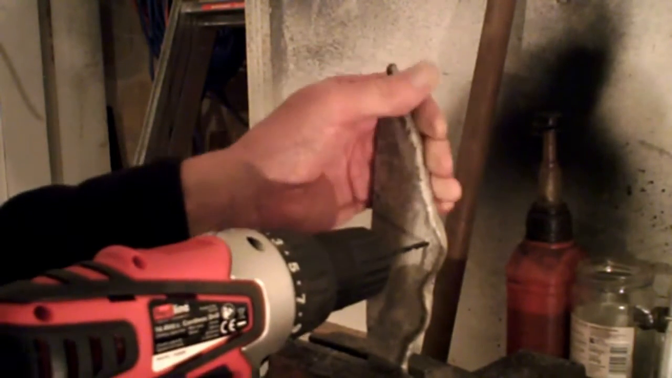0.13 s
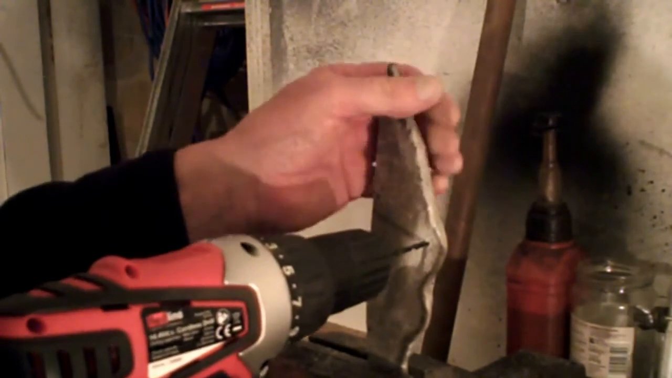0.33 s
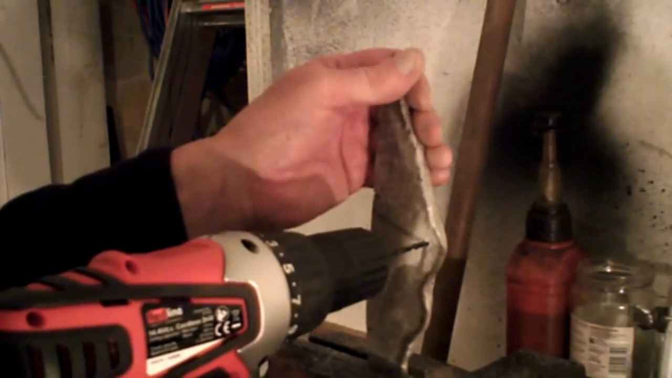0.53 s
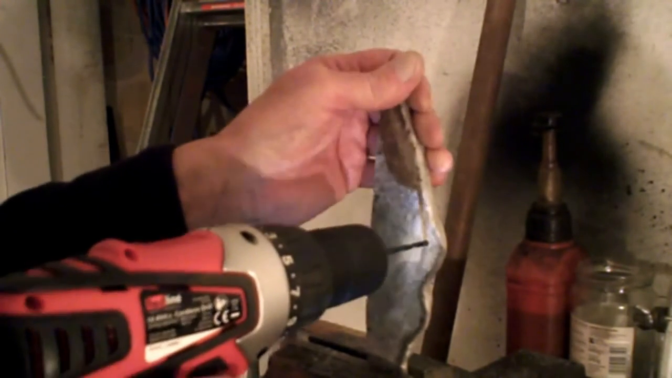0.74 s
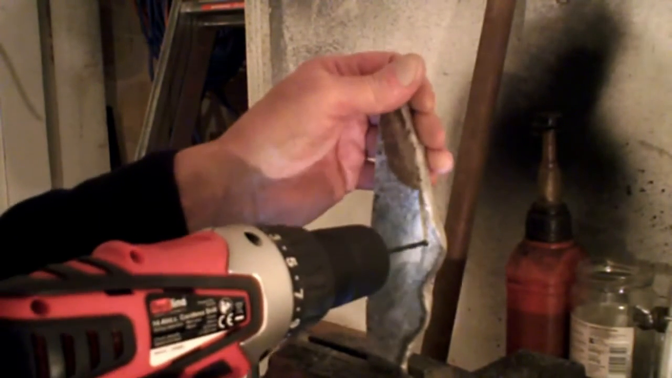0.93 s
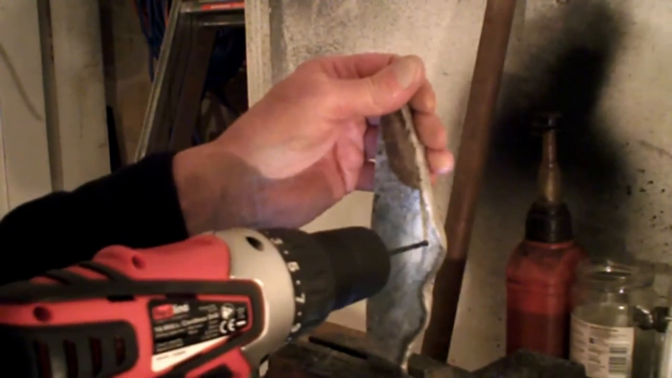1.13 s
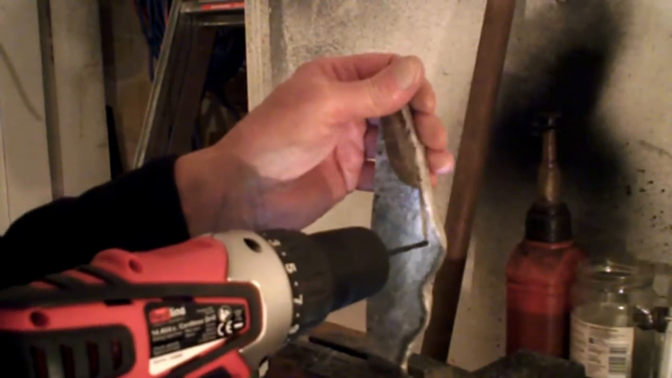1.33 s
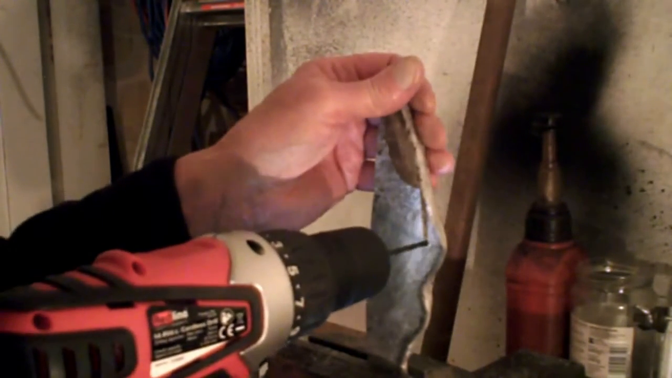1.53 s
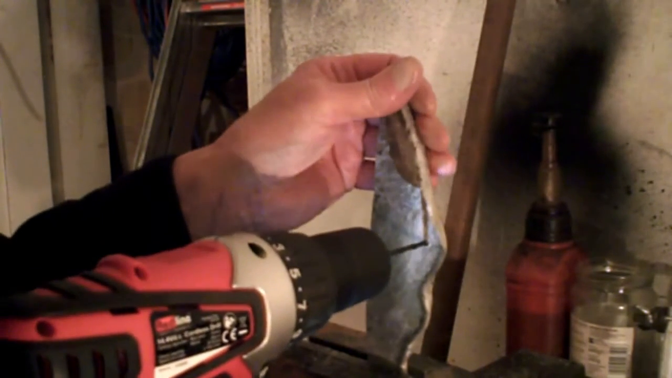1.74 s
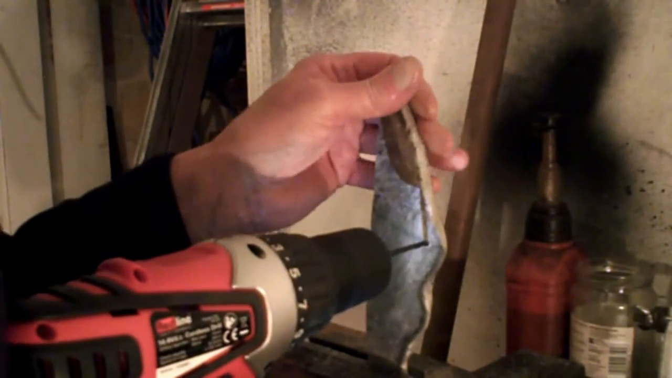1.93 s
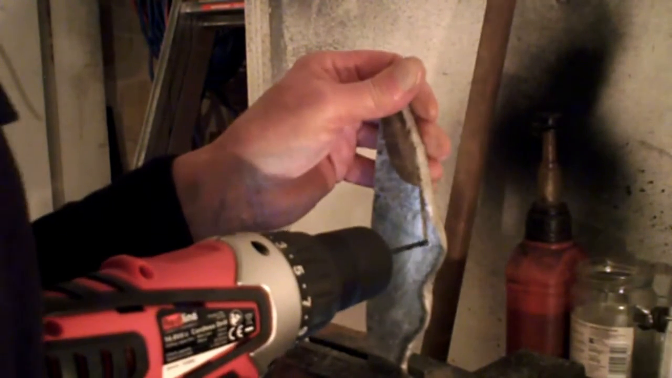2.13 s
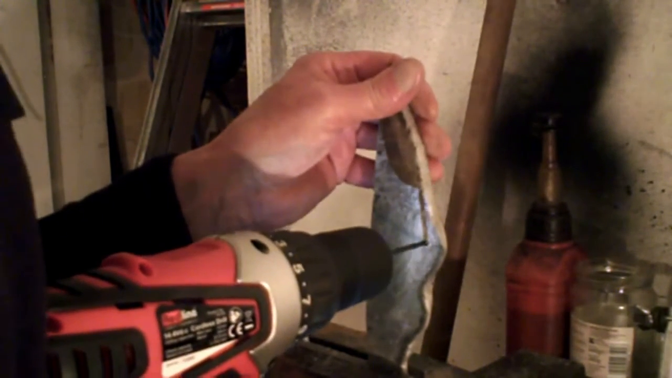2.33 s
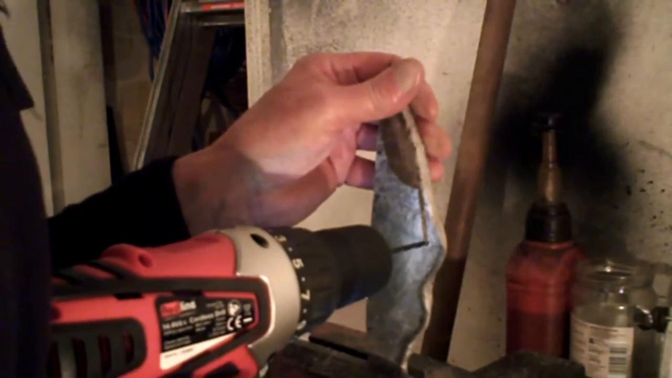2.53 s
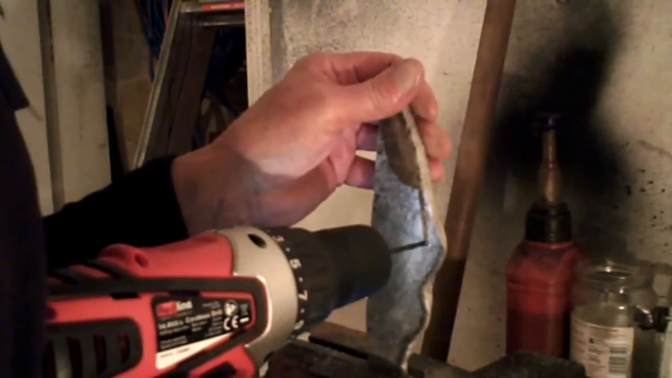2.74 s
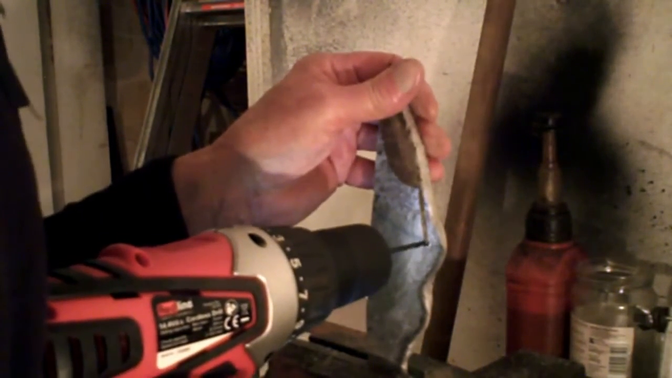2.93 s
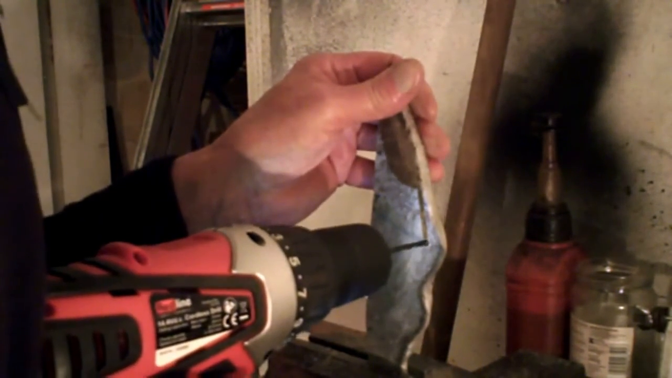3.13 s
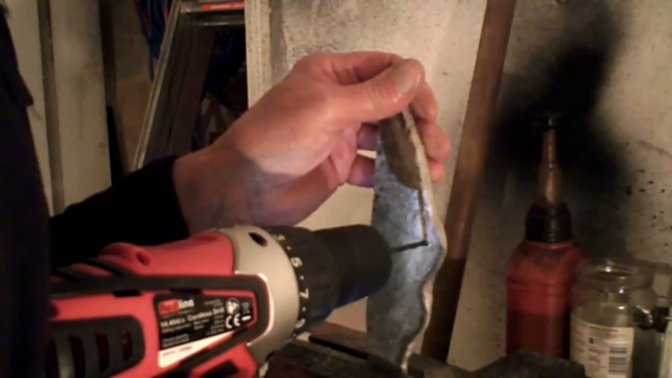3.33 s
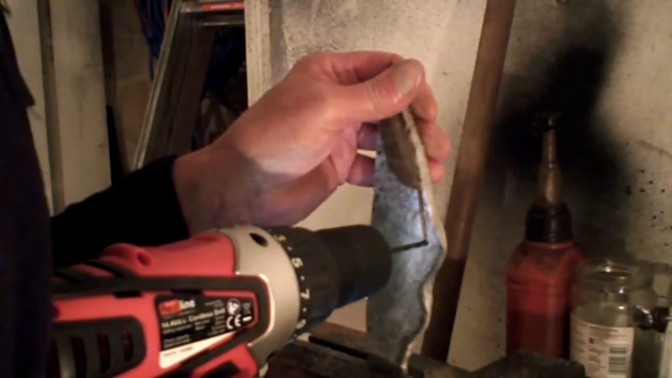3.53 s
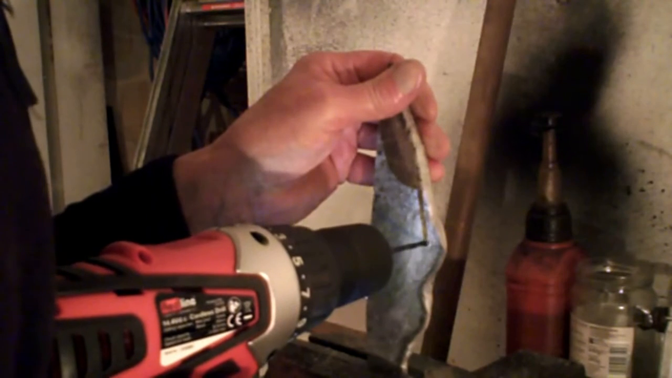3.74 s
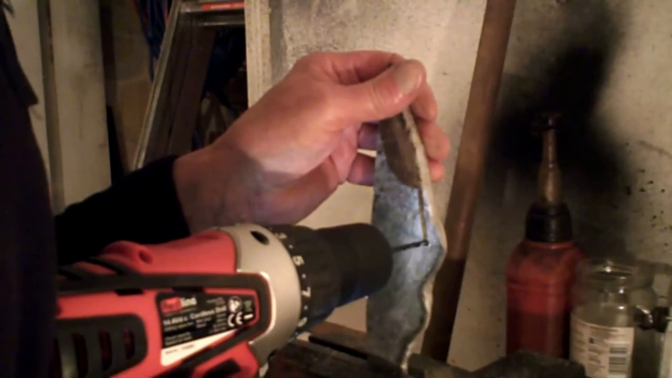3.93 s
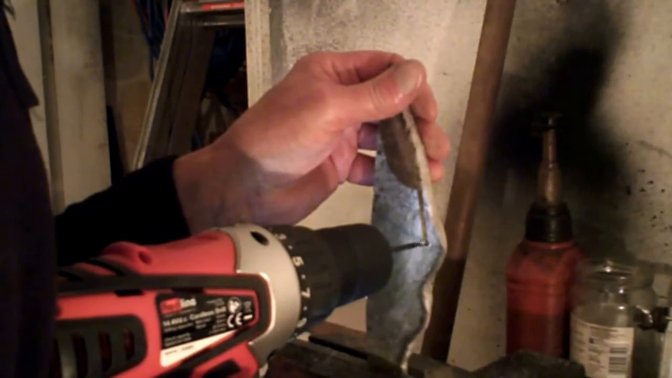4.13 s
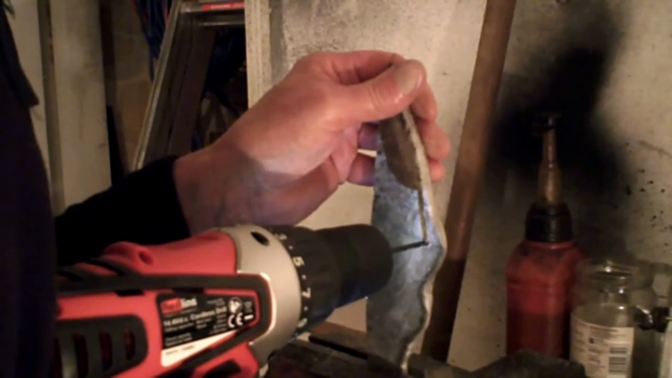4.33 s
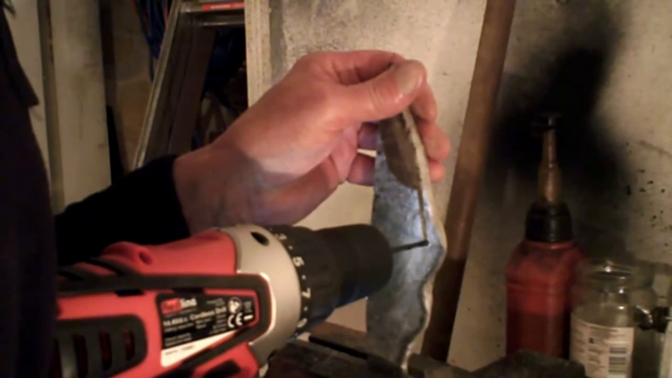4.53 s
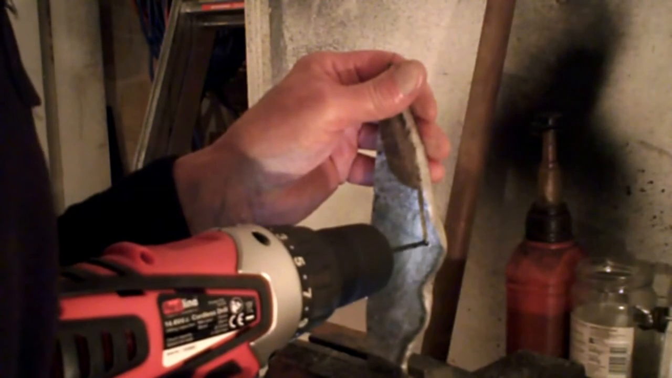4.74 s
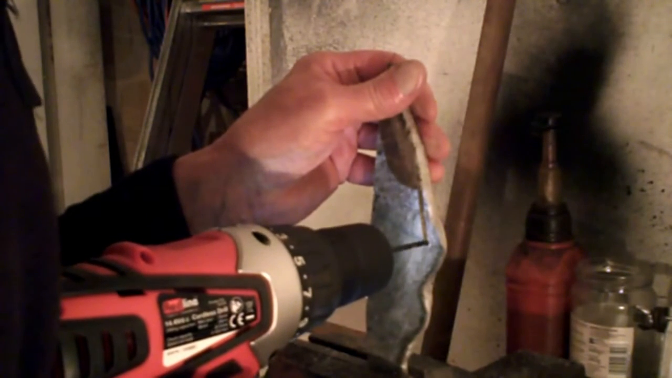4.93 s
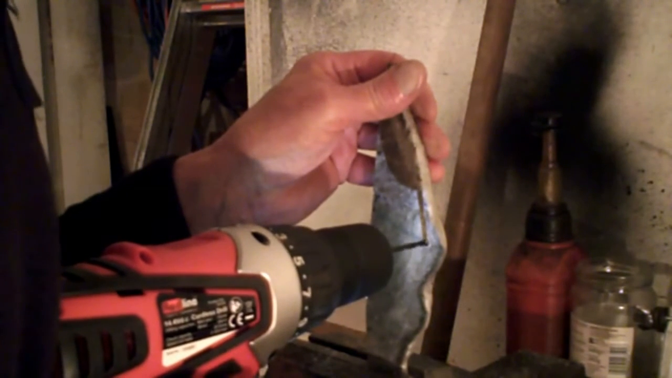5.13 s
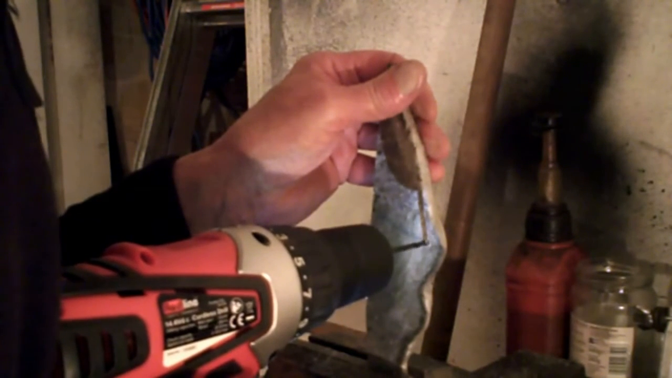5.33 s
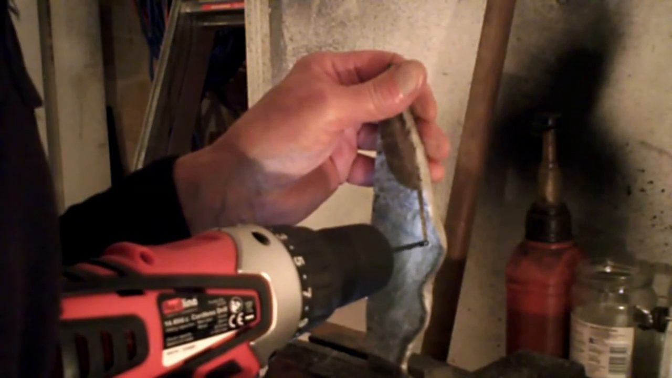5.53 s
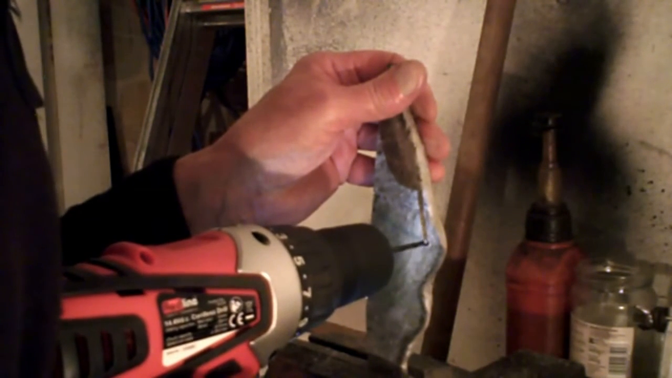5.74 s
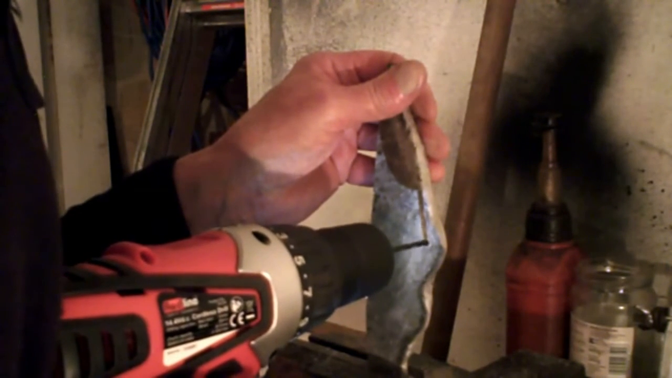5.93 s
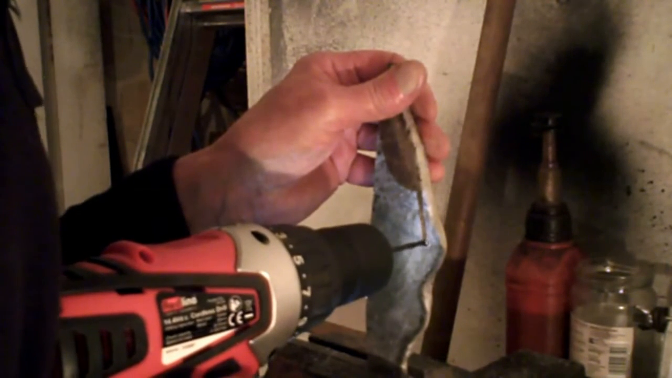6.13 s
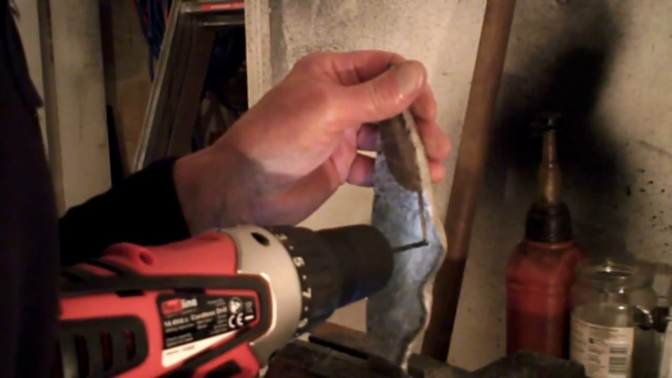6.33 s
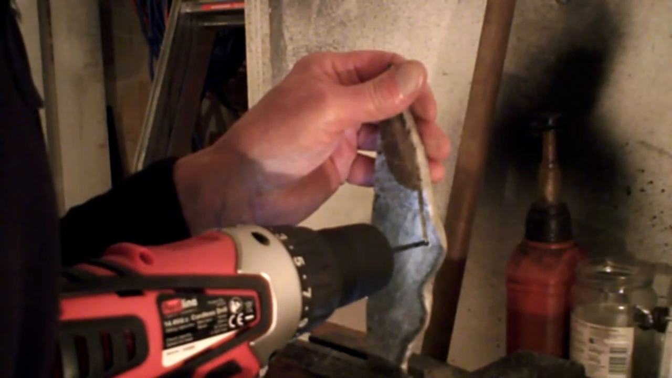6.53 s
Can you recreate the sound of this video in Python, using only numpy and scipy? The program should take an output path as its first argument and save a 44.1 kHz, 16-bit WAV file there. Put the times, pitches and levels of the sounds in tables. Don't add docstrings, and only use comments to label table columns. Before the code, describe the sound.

After faint handling knocks, a cordless drill clicks on, whirs up fast, then bites metal with a lower, gritty, pulsing whine in a quiet shed.

```python
import sys
import numpy as np
from scipy import signal
from scipy.fft import rfft, irfft, next_fast_len
from scipy.io import wavfile

SR = 44100
rng = np.random.default_rng(int(sys.argv[2]) if len(sys.argv) > 2 else 0)


def wrap_up_sound(samples):
    columns = np.atleast_2d(samples).T
    tamed = np.clip(columns, -1, 1)
    steps = np.round(tamed * 32767).astype(np.int16)
    wavfile.write(sys.argv[1], SR, steps)


def linear_from_db(decibels):
    return 10 ** (np.asarray(decibels, float) / 20)


N = 290619


def rms_one(x):
    return x / np.sqrt(np.mean(x ** 2) + 1e-20)


def drift(rate_hz):
    pole = np.exp(-80 * np.pi * rate_hz / SR)
    steps = rng.standard_normal(N // 40 + 2002)
    slow = signal.lfilter([1], [1, -2 * pole, pole * pole], steps)[2000:]
    return np.interp(np.arange(N) / 40, np.arange(len(slow)), rms_one(slow))


def hump(hz, centre_hz, width_hz, top_db):
    return top_db / (1 + (2 * (hz - centre_hz) / width_hz) ** 2)


def coloured(noise, spectrum, peaks=()):
    size = next_fast_len(N)
    hz = np.arange(size // 2 + 1) * SR / size + 1
    spectrum_hz, spectrum_db = np.transpose(spectrum)
    level_db = np.interp(np.log(hz), np.log(spectrum_hz), spectrum_db)
    for centre_hz, width_hz, top_db in peaks:
        level_db = level_db + hump(hz, centre_hz, width_hz, top_db)
    return rms_one(irfft(rfft(noise, size) * linear_from_db(level_db), size)[:N])


def ring(clicks, hz, t60):
    r, w = linear_from_db(-60 / (t60 * SR)), 2 * np.pi * hz / SR
    return signal.lfilter([0, np.sin(w)], [1, -2 * r * np.cos(w), r * r], clicks + 1e-18)


def band(x, low_hz, high_hz):
    return signal.sosfilt(signal.butter(2, [low_hz, high_hz], "band", fs=SR, output="sos"), x)


def lowpass(x, top_hz):
    return signal.sosfiltfilt(signal.butter(2, top_hz, fs=SR, output="sos"), x)


def controls():
    trigger_s, spin_up_s = .7154, .059
    bite_from_s, bite_s = 1.19, .87
    s = np.arange(N) / SR
    run = 1 - np.exp(-np.maximum(s - trigger_s, 0) / spin_up_s)
    effort = 4 * run * (1 - run)
    bite = np.clip((s - bite_from_s) / bite_s, 0, 1)
    return s, run, effort, bite


# (time [s], speed it settles to [turns/s])
MOTOR_SPEED = [(1.1, 337.3), (1.85, 337.8), (2.02, 336.0), (2.3, 325.6), (2.4, 324.0), (3.0, 325.68),
               (3.6, 324.6), (3.75, 322.85), (3.95, 318.2), (4.1, 317.2), (4.25, 319.0), (4.45, 324.1),
               (4.7, 324.95), (5.0, 324.3), (5.6, 325.27), (5.9, 324.3), (6.2, 324.68), (6.59, 327.5)]


def motor():
    s, run, _, _ = controls()
    speed = np.interp(s, *np.transpose(MOTOR_SPEED)) * run
    chuck = np.cumsum(speed) / SR / 36
    wobble = speed / 325 * (.9 * np.cos(2 * np.pi * (chuck - .95)) + .2 * drift(20))
    turns = np.cumsum(speed + wobble) / SR
    return speed, turns, chuck


def load_shares(speed, multiple):
    light = 1 / (1 + np.exp(np.clip(335 - .2 * multiple - speed, -40, 40) / 1.3))
    light = np.maximum(light, np.arange(N) < 1.1 * SR)
    pushed = 1 / (1 + np.exp(np.clip(speed - 320.8, -40, 40) / .7))
    return light, pushed * (1 - light)


# (multiple of motor speed, running light [dB], cutting [dB], pushed hard [dB])
SLOT_LINES = [(3, -28.5, -24.3, -24), (6, -39, -42, -41), (9, -50, -54, -44), (12, -41, -43, -45),
              (15, -40, -41, -37), (18, -45, -57, -50), (21, -49, -63, -49), (24, -49, -61, -47),
              (27, -44, -39.5, -59), (30, -56, -55, -65), (33, -66, -68, -60), (36, -66, -70, -55)]
GEAR_LINES = [(1.25, -63, -50, -48), (2.5, -51, -42, -41), (3.583, -48, -39, -44), (3.75, -37, -38, -41),
              (7.5, -31, -40.5, -38.5), (7.833, -56, -44, -50), (8.167, -48, -44, -50),
              (8.5, -40, -41, -44), (14.5, -57, -43, -40), (21.5, -62, -48, -63), (22.5, -47, -44, -55)]
SHAFT_LINES = [(1, -51, -41, -47), (2, -43, -56, -57), (4, -44, -38, -38), (5, -43, -41, -46),
               (7, -51, -49, -56), (8, -47, -34, -35), (13, -45, -55, -55), (14, -44, -48, -41),
               (16, -58, -51, -46), (17, -59, -47, -48), (19, -63, -50, -55), (25, -53, -57, -48),
               (26, -53, -58, -58), (28, -54, -52, -53), (29, -46, -63, -58), (31, -60, -52, -54),
               (32, -53, -63, -53), (34, -58, -72, -61), (37, -70, -59, -57), (40, -70, -65, -60)]
RUN_UP_LINES = {1: -56, 1.25: -62, 2.5: -42, 3: -25, 4: -41, 6: -43, 7.5: -40, 7.833: -38, 8: -34, 15: -36,
                22.5: -48, 27: -48, 30: -49}
# (centre [Hz], width [Hz], boost [dB])
GLIDE_MODES = [(760, 290, 7.5), (2880, 200, 12), (3840, 350, 15.5), (4680, 310, 14.5), (7400, 540, -13),
               (9000, 600, 10), (9900, 600, 13)]
CHUCK_SWELL = {1.25: (.5, .66), 2.5: (.3, .99), 4: (.3, .35), 5: (.3, .38), 7: (.5, .97), 7.5: (.9, .36),
               8.5: (.6, .1), 8: (.8, .83), 12: (.4, .98), 14.5: (.5, .94), 15: (.65, .52), 21.5: (.4, .27),
               22.5: (.9, .33), 27: (.12, .55), 28: (.5, .45), 31: (.5, .87), 37: (.4, .97)}


def whine(speed, turns, chuck):
    s, _, _, bite = controls()
    onset_db = -1.81 + 1400 * np.minimum(s - .765, 0)
    octave_db = -46 + 11 * bite + 9.5 * np.clip((1.4 - s) / .22, 0, 1)
    mesh_db = {7.5: -31.5, 15: octave_db}
    rising = np.clip((1 - s) / .1, 0, 1)
    out = np.zeros(N)
    for multiple, light_db, cut_db, pushed_db in SLOT_LINES + GEAR_LINES + SHAFT_LINES:
        light, pushed = load_shares(speed, multiple)
        level_db = cut_db + light * (light_db - cut_db) + pushed * (pushed_db - cut_db)

        rising_db = RUN_UP_LINES.get(multiple, -48 - .25 * multiple)
        modes_db = sum(hump(multiple * speed, *mode) for mode in GLIDE_MODES)
        level_db += rising * (rising_db + modes_db - 4 - light_db) + onset_db
        if multiple in mesh_db:
            level_db += light * (1 - rising) * (mesh_db[multiple] - level_db)

        depth, top_at = CHUCK_SWELL.get(multiple, (0, 0))
        swell = 1 + depth * (1 - .97 * light) * np.cos(2 * np.pi * (chuck - top_at))
        swell = swell / np.sqrt(1 + depth ** 2 / 2)
        if 14.2 < multiple < 15.5:
            throb = .9 + .7 * np.cos(2 * np.pi * (chuck - .27))
            swell += pushed * (throb - swell)

        level_db += 1.0 * (multiple > 3.3) - 2.5 * (multiple == 12)
        level_db += 2.5 * pushed * (7.2 < multiple < 8.1)
        flutter_db = .7 + .02 * multiple + .8 * (3.3 < multiple < 26) * (1 - light)
        flutter_db = flutter_db + 2.5 * light * (multiple < 2.3)
        level_db = level_db + flutter_db * drift(14)
        sine = np.sin(2 * np.pi * (multiple * turns + rng.random()))
        out += np.sqrt(2) * swell * linear_from_db(level_db) * sine
    return linear_from_db(1.3) * out


def by_angle(turns, length, carrier_gain, uneven_db):
    points_a_turn = 256
    size = length * points_a_turn
    multiple = np.arange(size // 2 + 1) / length
    spectrum = rfft(rng.standard_normal(size)) * (multiple < 48)
    spectrum *= linear_from_db(np.minimum(.3 * multiple, 2.5) * np.cos(2 * np.pi * multiple))
    spectrum *= linear_from_db(uneven_db * rng.standard_normal(len(multiple)))
    spectrum[::length // 12] *= carrier_gain
    low = multiple < 2.4
    size_of_low = np.abs(spectrum[low])
    spectrum[low] *= np.sqrt(np.mean(size_of_low ** 2)) / (size_of_low + 1e-9)
    table = rms_one(irfft(spectrum, size))
    return np.interp(turns * points_a_turn % size, np.arange(size + 1), np.append(table, table[0]))


# (frequency [Hz], spectrum level [dB])
CASING = [(25, -60), (170, -30), (270, -23), (420, -9.5), (700, -4.5), (1000, -1.5), (1700, -9), (2100, -7),
          (3100, -8.5), (4800, -7.5), (6300, -14.5), (8500, -15.5), (10500, -27), (15500, -34.5)]
# (centre [Hz], width [Hz], boost [dB])
CASING_PEAKS = [(570, 146, -2.5), (800, 200, 1), (1310, 420, 4), (1610, 180, 4), (2100, 71, 2.5),
                (2200, 93, -2.5), (2720, 240, 6.5), (3180, 170, -3.5), (3800, 340, 2), (4550, 250, 0.5),
                (6700, 450, -3)]


def rattle(speed, turns, chuck):
    s, run, effort, bite = controls()
    teeth = by_angle(turns, 72, carrier_gain=2.2, uneven_db=4.5)
    chips = by_angle(turns, 2000, carrier_gain=1, uneven_db=0)
    steady = chips + lowpass(teeth - chips, 6000)
    geared = .85 * np.clip(speed / 325, 0, 1) ** 6
    brush_hiss = rng.standard_normal(N)
    mixed = np.sqrt(geared) * (.92 * steady + .4 * chips) + np.sqrt(1 - geared) * brush_hiss
    noise = coloured(mixed, CASING, CASING_PEAKS)

    body = lowpass(noise, 1900)
    bright = (noise - body) * linear_from_db(.5 * np.cos(2 * np.pi * (chuck - .27)) + .66 * drift(13.6))
    scrape = .45 * bite * np.cos(np.pi * (chuck - .27)) ** 6
    bright = bright + scrape * band(bright, 7600, 12300)
    body = body + .8 * bite * band(body, 1175, 1335)

    speed_db = 20 * np.log10(np.maximum(run, .05))
    clog_db = drift(18)
    body_db = -34 + 3 * bite + .63 * speed_db + clog_db
    bright_db = -32 + 4.5 * effort + speed_db
    body = body * linear_from_db(body_db) / np.std(band(noise, 994, 1644))
    bright = bright * linear_from_db(bright_db) / np.std(band(noise, 3440, 5020))
    running = np.clip((s - .695) / .012, 0, 1)
    return running * (body + bright)


# (frequency [Hz], level [dB], t60 [s])
SNAG_MODES = [(4900, -3, .008), (7100, -4, .014), (7600, -8, .008), (8150, -4, .012), (8400, 0, .02),
              (11600, -13, .008), (12200, -12, .01)]


def snags(speed, chuck):
    at = np.flatnonzero(np.diff(np.floor(chuck - .2)) > 0)
    chance = rng.normal(0, 1, (64, 3 + len(SNAG_MODES)))[:len(at)].T
    at = np.clip(at + (chance[0] * .001 * SR).astype(int), 0, N - 1)
    light, _ = load_shares(speed, 0)
    blow_db = -27 + 1.5 * chance[1] - 5 * light[at]
    clicks = np.zeros(N)
    clicks[at] = linear_from_db(blow_db - 10 + 2.5 * chance[2])
    crack = np.convolve(clicks, np.hanning(round(.0027 * SR)))[:N]
    out = band(crack * rng.standard_normal(N), 7000, 14500)
    for (hz, level_db, t60), spread in zip(SNAG_MODES, chance[3:]):
        clicks[at] = linear_from_db(blow_db + level_db + 1 + 1.5 * spread) * np.sign(spread)
        out += ring(clicks, hz, t60)
    return out


# (time [s], peak level [dB], pitch [Hz], t60 [s])
KNOCKS = [(.21, -41, 800, .06), (.299, -45, 1760, .04), (.356, -34, 840, 0.13), (0.357, -43, 1700, .1),
          (0.375, -41, 1900, 0.076), (.392, -36, 1300, .04), (.484, -47, 5900, .04),
          (0.565, -46, 5300, .02), (.611, -51, 4000, .015), (.702, -52, 3800, 0.045),
          (.712, -42, 8500, .02), (.7285, -16.5, 1070, 0.022), (.7295, -19.5, 2320, .025),
          (.73, -23, 4580, 0.042)]


def knocks():
    out = np.zeros(N)
    age = np.arange(round(.2 * SR)) / SR
    for s, peak_db, hz, t60 in KNOCKS:
        at = round(s * SR)
        burst = rms_one(band(rng.standard_normal(len(age)), hz / 1.4, hz * 1.3))
        out[at:at + len(age)] += .5 * linear_from_db(peak_db - 60 * age / t60) * burst
    return out


def rumble():
    rest_db, running_db = -83, -63.5
    s, run, _, _ = controls()
    noise = rms_one(band(rng.standard_normal(N), 25, 280))
    grip_db = 9 * np.exp(-((s - 1.25) / .18) ** 2)
    lumps_db = 2.5 * drift(3)
    return linear_from_db(rest_db + run * (running_db - rest_db + grip_db + lumps_db)) * noise


# (frequency [Hz], spectrum level [dB])
SHED = [(35, -56), (60, -35), (145, -22), (244, -8), (359, -6), (460, -3), (564, -9.5), (792, -6.5),
        (5180, -18), (13400, -32.5)]


def shed_hush():
    return linear_from_db(-54.5 + .77 * drift(24)) * coloured(rng.standard_normal(N), SHED)


def scene():
    speed, turns, chuck = motor()
    drill = whine(speed, turns, chuck) + rattle(speed, turns, chuck) + snags(speed, chuck)
    return np.tile(drill + knocks() + rumble() + shed_hush(), (2, 1))


def band_limit(x):
    return signal.sosfilt(signal.butter(12, 15330, fs=SR, output="sos"), x)


def record(dry):
    top_cut = signal.ellip(12, .3, 60, 15080, fs=SR, output="sos")
    mix = signal.sosfilt(top_cut, dry)
    return band_limit(mix)


dry = scene()
out = record(dry)
wrap_up_sound(out)
```